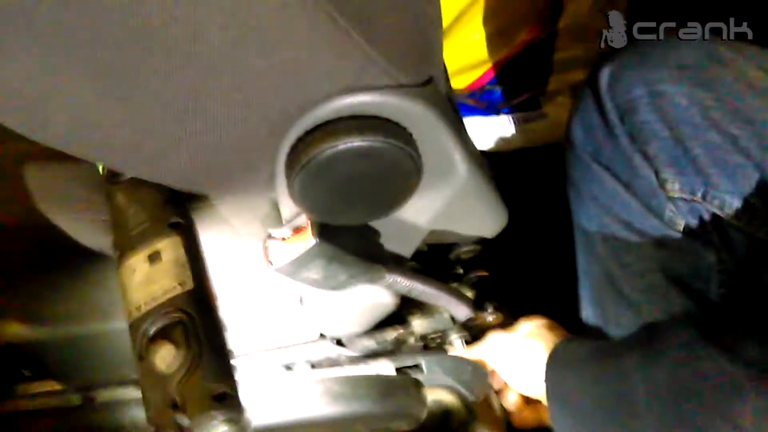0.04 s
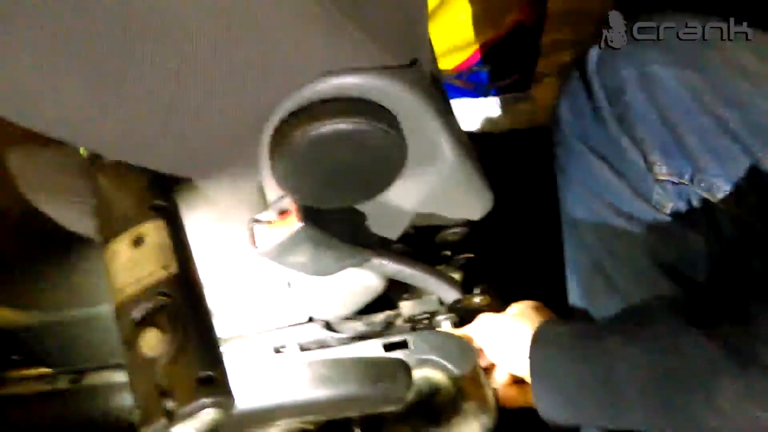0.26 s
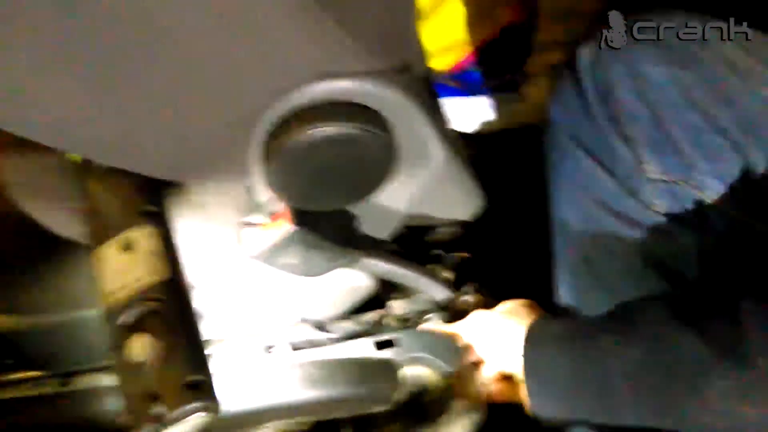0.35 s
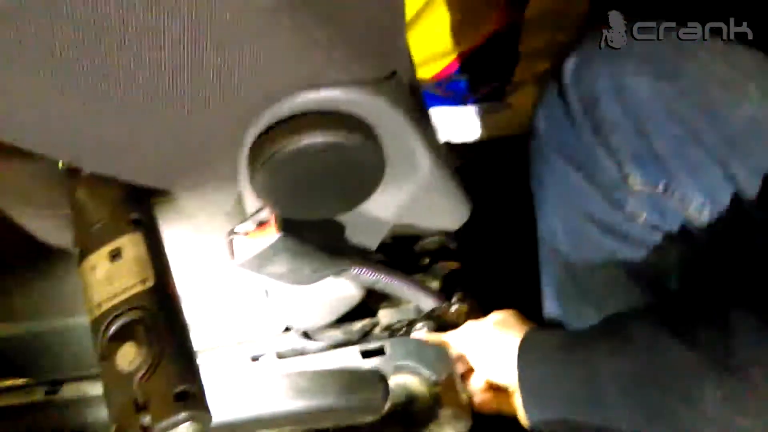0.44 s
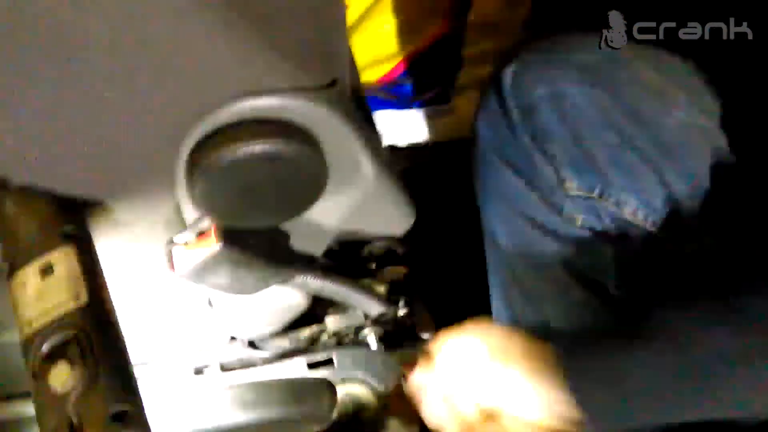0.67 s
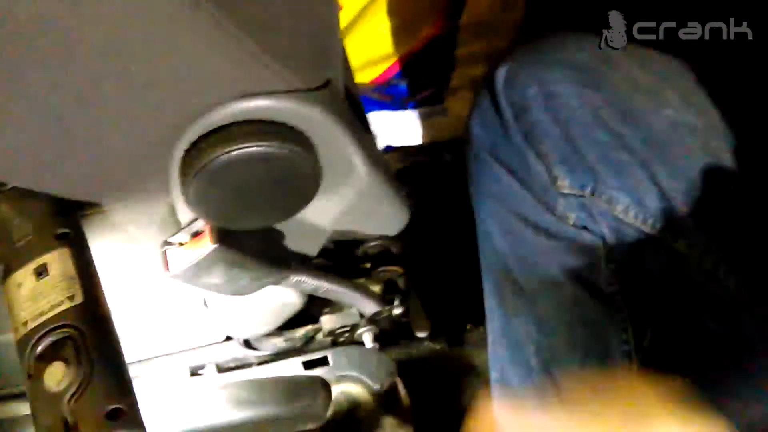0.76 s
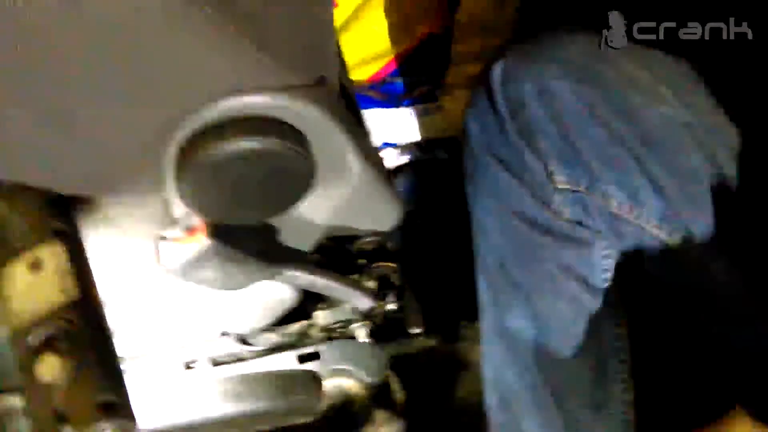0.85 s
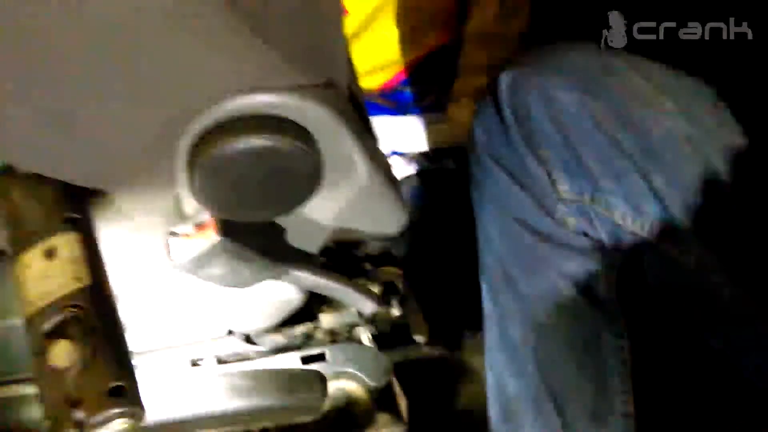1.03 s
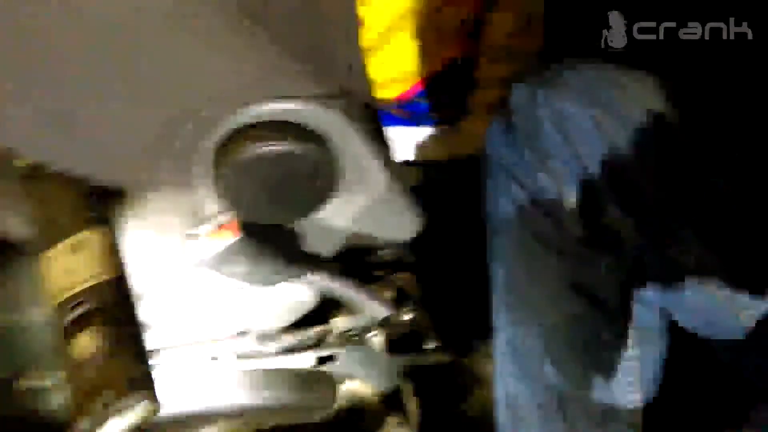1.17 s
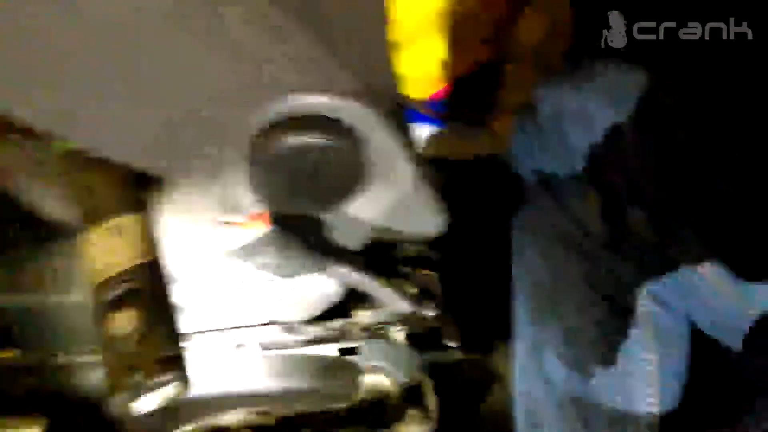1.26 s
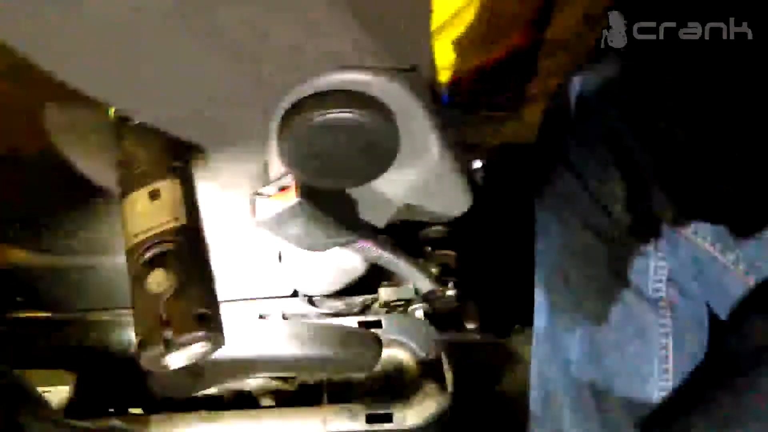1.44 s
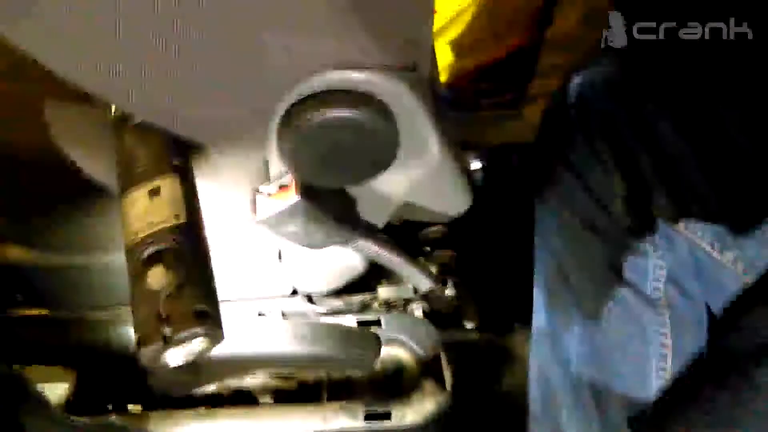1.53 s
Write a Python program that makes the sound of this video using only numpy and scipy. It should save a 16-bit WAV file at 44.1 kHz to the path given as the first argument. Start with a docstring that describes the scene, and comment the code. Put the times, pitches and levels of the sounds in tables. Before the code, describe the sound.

One sharp plastic and metal click with a dull thump, then a faint sleeve swish.

```python
"""A plastic part clacks and a metal catch snaps as a hand tool levers the part loose in a parked car.
Each impact excites damped normal modes and a burst of contact noise. The panel behind gives softly,
then thumps in its low modes; absorption in the padded cabin makes the reverberation brief.
Sliding friction makes the sleeve swish as the arm draws back. Light taps, a thin high whine,
a low rumble and a soft hiss lie around it."""
import sys
import numpy as np
from scipy import signal
from scipy.fft import rfft, irfft
from scipy.io import wavfile
from scipy.ndimage import uniform_filter1d

SR = 44100
rng = np.random.default_rng(int(sys.argv[2]) if len(sys.argv) > 2 else 0)


def log_audio(samples):
    """Write samples as a 16-bit WAV file to the path given in sys.argv[1]."""
    # one column per channel
    frames = np.atleast_2d(samples).T
    # limit to full scale, then quantise
    limited = np.clip(frames, -1, 1)
    pcm = np.round(limited * 32767).astype(np.int16)
    wavfile.write(sys.argv[1], SR, pcm)


N = 70560
RING_T = np.arange(SR // 2) / SR  # time since an impact, t/s
ONSET_S = 0.0005  # rise time constant of clacks and taps

# impacts on the plastic part: t/s, level/dB, treble gain/dB, mode frequency ratio
CLACKS = [(.2100, -20.5, -12, 0.904), (0.2144, -18, -20, 0.73), (.2226, -3, -10, 1.0),
          (.2246, -7, -4.5, 1.1), (.2265, -14, -17, 1.07)]
# modes of the plastic part: f/Hz, left level/dB, right level/dB, T60/s
PLASTIC_MODES = [(663, -29, -33, 0.023), (850, -39, -44, 0.013), (1150, -28, -23, 0.015),
                 (1518, -24, -10.5, 0.024), (1820, -46, -20, 0.031), (3140, -22, -21, 0.012),
                 (3480, -13.5, -14, 0.011), (5570, -19, -17, .012), (9530, -35, -19, 0.017),
                 (10700, -15, -39, 0.011)]
# its contact noise spectrum: f/Hz, left level/dB, right level/dB
CLACK_NOISE = [(202, 7.5, 15), (795, 8.5, 8.5), (1630, 5, 15.5), (3150, -17, 4), (4370, -7, 6.5),
               (7060, -2, 4.5), (9750, -3, 10), (13500, -9, -12), (16000, -16, -35)]


def clack(db, treble_db, pitch, treble_hz=4150):
    """Impact excitation: the plastic rings in heavily damped modes; gentle knocks are duller."""
    hit = modal_ring(PLASTIC_MODES, pitch) + amp(-15) * contact_noise(CLACK_NOISE, t60=0.026)
    hit *= 1 - np.exp(-RING_T / ONSET_S)
    dull = signal.sosfilt(signal.butter(2, treble_hz, fs=SR, output="sos"), hit)
    return amp(db) * (dull + amp(treble_db) * (hit - dull))


# impacts of the metal catch: t/s, level/dB
SNAPS = [(0.235, -9.5), (0.2401, 0), (.2409, -4), (0.2425, -9)]
# modes of the catch: f/Hz, left level/dB, right level/dB, T60/s
METAL_MODES = [(2150, -42, -26.5, 0.026), (2490, -42, -31.5, 0.026), (3250, -31, -27, .022),
               (5200, -48, -33, 0.015), (7270, -33, -18, 0.014), (7550, -29, -17, 0.018),
               (8230, -36, -26, 0.011), (10350, -33, -22.5, 0.017), (11850, -38, -28, 0.02),
               (13470, -22, -28, 0.0093)]
# its contact noise spectrum: f/Hz, left level/dB, right level/dB
SNAP_NOISE = [(300, -5, 7), (1610, -7, -2), (2400, -8, 6), (4160, -9, -7.5), (6540, -17, 2.5),
              (7820, 2, 11.5), (8800, -7, 2), (13900, -1, -6), (16000, -10, -8)]


def snap(db):
    """Free vibration: the metal catch springs against its stop and rings in high modes."""
    return amp(db) * (modal_ring(METAL_MODES) + amp(-20.5) * contact_noise(SNAP_NOISE, t60=0.02))


# pushes on the panel: t/s, level/dB, contact time/s
PUSHES = [(0.109, -19, 0.005), (.142, -9.5, 0.0069), (.2105, -8.5, 0.0016), (0.2172, -5, 0.0026),
          (0.2219, -10, 0.0011), (0.228, 1, 0.0018), (0.2515, 0, 0.00317), (.2765, -6.5, 0.0034),
          (.388, -10, 0.011), (.445, -10.5, 0.0083), (1.0232, -31, 0.00091), (1.18, -15, 0.009)]
# modes of the panel: f/Hz, level/dB, T60/s
PANEL_MODES = [(81.6, -33.5, 0.31), (107, -20.5, 0.075), (147, -23, 0.1), (189.4, -29, 0.167),
               (252.1, -20.5, 0.069), (304.4, -24.5, 0.085), (490, -19.5, 0.048), (670, -52, 0.06)]


def thump(db, contact_s):
    """Forced response: a half-sine force pulse is convolved with the panel's impulse response."""
    force = np.sin(np.pi * np.minimum(RING_T / contact_s, 1))
    response = sum(amp(level) * damped_mode(hz, t60) for hz, level, t60 in PANEL_MODES)
    radiation = signal.butter(2, 46, "high", fs=SR, output="sos")  # slow motion radiates little
    response = signal.sosfilt(radiation, response)
    return -amp(db) * signal.fftconvolve(response, force / force.sum())[:len(RING_T)]


# reverberation of the cabin: f/Hz, T60/s, level/dB
CABIN_DECAY = [(60, .45, -7), (170, .33, -8), (300, .3, -15), (490, .9, -10), (680, .11, -17),
               (2500, .09, -18), (8000, .06, -20), (16000, .055, -19)]


def cabin(sound):
    """Reverberation: padding absorbs the treble quickly, while the bass lingers."""
    hz, t, bands = signal.stft(rng.standard_normal((2, SR)), SR, nperseg=256)
    bands[1, :3] = bands[0, :3]  # the bass is alike on both sides
    t60 = read(CABIN_DECAY, hz)[:, None]
    equal_energy = np.sqrt(2 * np.log(1000) / (t60 * SR))
    bands *= amp(read(CABIN_DECAY, hz, column=2))[:, None] * decay(t60, t) * equal_energy
    response = signal.istft(bands, SR, nperseg=256)[1]
    return signal.fftconvolve(sound, response, axes=1)[:, :N]


# friction spectrum of the sleeve: f/Hz, left level/dB, right level/dB
SLEEVE_SPECTRUM = [(152, -20, -17), (370, -8.5, -8.5), (566, -1.5, 6), (856, -20, -9.5), (926, -4.5, 1),
                   (1380, -14, -6.5), (1737, -22, -4.5), (2300, -7, 2.5), (2900, -13, -4.5),
                   (4300, -22.5, -11.5), (5660, -20.5, -21), (8350, -18.5, -6.5), (11500, -16.5, -12.5),
                   (15500, -23, -24)]


def sleeve(peak_s=0.63, rise_s=0.12, fall_s=0.095):
    """Friction noise: the swish of sliding cloth grows in proportion to the arm's speed."""
    hz, t = np.fft.rfftfreq(N, 1 / SR), np.arange(N) / SR - peak_s
    shared, own = rfft(rng.standard_normal(N)), rfft(rng.standard_normal((2, N)))
    correlation = 1 / (1 + (hz / 2000) ** 2)
    spectrum = np.sqrt(correlation) * shared + np.sqrt(1 - correlation) * own
    swish = unit(irfft(spectrum * stereo_gains(SLEEVE_SPECTRUM, hz), N))
    speed = 1 / np.cosh(np.sqrt(2) * t / np.where(t < 0, rise_s, fall_s))
    return amp(-48) * speed * swish


# light taps among the parts: t/s, right level/dB, centre f/Hz, bandwidth/octaves, T60/s
TAPS = [(.0705, -36, 2500, .7, .025), (.0728, -33, 1400, .45, .028), (.0955, -32, 300, .35, .07),
        (.905, -50, 1000, 1.2, .025), (1.0232, -39, 800, 2.3, .02), (1.327, -52, 2000, .3, .025)]


def tap(db, hz, octaves, t60, left_db=-13):
    """Band-limited transient: a light touch on a small part gives a short rattle in one band."""
    edges = np.clip([hz / 2 ** (octaves / 2), hz * 2 ** (octaves / 2)], 20, SR / 2 - 1)
    bandpass = signal.butter(3, edges, "band", fs=SR, output="sos")
    rattle = signal.sosfilt(bandpass, rng.standard_normal(SR))[-len(RING_T):]
    envelope = decay(t60) * (1 - np.exp(-RING_T / ONSET_S))
    return amp([[db + left_db], [db]]) * unit(rattle) * envelope


# envelope of the whine: t/s, level/dB before the left and right gains
WHINE_ENVELOPE = [(.40, -93), (.42, -66), (.48, -73), (.525, -59.5), (.61, -71), (.68, -70), (.735, -58.5),
                  (.78, -70), (.87, -63.5), (.93, -75), (.975, -60.5), (1.01, -87), (1.2, -80),
                  (1.27, -101)]


def whine(centre_hz=7522, waver_hz=12.5, left_db=-12.5, right_db=5.5):
    """Frequency and amplitude modulation: a thin high tone wavers, pulses and fades."""
    hz = centre_hz + waver_hz * drift(N, size=700)
    tone = np.sqrt(2) * np.sin(2 * np.pi * np.cumsum(hz) / SR)
    db = np.interp(np.arange(N) / SR, *np.transpose(WHINE_ENVELOPE), left=-np.inf, right=-np.inf)
    return amp([[left_db], [right_db]]) * amp(db) * tone


# spectral density of the background: f/Hz, relative level/dB
FLOOR_SPECTRUM = [(12, -21), (25, -2.5), (60, 1), (100, -4), (190, -16), (290, -19), (360, -25.5),
                  (520, -25.5), (1250, -36), (2350, -31.5), (3900, -44.5), (6700, -44.5), (8700, -40),
                  (14700, -53), (16000, -56)]
# its balance: f/Hz, left level re right/dB
FLOOR_BALANCE = [(60, -0.5), (120, -0.5), (240, -0.5), (480, -2.0), (950, -4.5), (1890, -13.0),
                 (3770, -9.5), (7520, -9.5), (15000, -3.5)]
# likeness of its two sides: f/Hz, correlation coefficient
FLOOR_CORRELATION = [(60, 0.96), (150, 1), (380, 0.75), (950, 0.19), (2380, -0.26), (5980, 0.094),
                     (15000, -0.18)]


def background(swell_db=1.2, rumble_hz=216, flicker_db=1.5):
    """Partially coherent noise: an unevenly swelling rumble under a hiss stronger on the right."""
    hz, frames = np.fft.rfftfreq(1024, 1 / SR), N // 256 + 5
    a, b, c, d, flicker = rng.standard_normal((frames, len(hz), 5)).T
    shared, own = a + 1j * b, c + 1j * d
    correlation = np.clip(read(FLOOR_CORRELATION, hz), -1, 1)[:, None]
    left = amp(read(FLOOR_BALANCE, hz))[:, None]
    bands = np.array([left * shared, correlation * shared + np.sqrt(1 - correlation ** 2) * own])
    bands *= 2 / np.sqrt(1 + left ** 2 + 2 * correlation * left)  # the mean of both sides stays flat
    flicker = uniform_filter1d(flicker, size=10, axis=0)  # smooth over frequency
    flicker = unit(uniform_filter1d(flicker, size=14, axis=1))  # and over time
    swell = swell_db * drift(frames, size=12) / (1 + (hz[:, None] / rumble_hz) ** 2)
    bands *= amp(read(FLOOR_SPECTRUM, hz)[:, None] + flicker_db * flicker + swell)
    return amp(-47) * unit(signal.istft(bands, nperseg=1024, noverlap=768)[1][:, :N])


def modal_ring(modes, pitch=1, scatter=0.004):
    """Modal superposition: each blow gives every mode a slight detuning and a random sign per side."""
    sound = np.zeros((2, len(RING_T)))
    for hz, left_db, right_db, t60 in modes:
        polarity = np.sign(rng.standard_normal((2, 1)))
        detuning = 1 + scatter * rng.standard_normal()
        sound += polarity * amp([[left_db], [right_db]]) * damped_mode(hz * pitch * detuning, t60)
    return sound


def contact_noise(spectrum, t60):
    """Broadband transient: a contact gives a dying noise burst, partly shared by both sides."""
    n = len(RING_T)
    white = rng.standard_normal(n) + 0.5 * rng.standard_normal((2, n))
    gains = stereo_gains(spectrum, np.fft.rfftfreq(n, 1 / SR))
    return irfft(rfft(white) * gains, n) * decay(t60)


def damped_mode(hz, t60):
    """Impulse response of a damped harmonic oscillator."""
    return np.sin(2 * np.pi * hz * RING_T) * decay(t60)


def decay(t60, t=RING_T):
    """Exponential decay by 60 dB in t60 seconds."""
    return np.exp(-np.log(1000) * t / t60)


def drift(length, size):
    """Low-pass noise: a slow wander of rms 1, smoothed over size steps."""
    return unit(uniform_filter1d(uniform_filter1d(rng.standard_normal(length), size), size))


def stereo_gains(spectrum, hz):
    """Left and right magnitude responses from a table of levels."""
    return amp([read(spectrum, hz, column=1), read(spectrum, hz, column=2)])


def read(table, hz, column=1):
    """Interpolation of one column over log frequency."""
    rows = np.array(table, float)
    return np.interp(np.log(hz + 1), np.log(rows[:, 0] + 1), rows[:, column])


def amp(db):
    """Amplitude ratio of a level in decibels."""
    return 10 ** (np.asarray(db) / 20)


def unit(x):
    """Normalisation to rms 1."""
    return x / np.sqrt(np.mean(x ** 2) + 1e-20)


def scene():
    """Linear superposition: the impacts and their reverberation add to the swish, noise and whine."""
    hits = np.zeros((2, N))
    for source, events in ((clack, CLACKS), (snap, SNAPS), (thump, PUSHES), (tap, TAPS)):
        for start_s, *settings in events:
            span = hits[:, round(start_s * SR):][:, :len(RING_T)]
            span += source(*settings)[..., :span.shape[1]]
    return hits + cabin(hits) + sleeve() + background() + whine()


def record(dry):
    """Band limiting: a linear-phase low-pass filter cuts off at 16.2 kHz."""
    lowpass = signal.firwin(511, 16200, window=("kaiser", 9), fs=SR)
    return signal.oaconvolve(dry, lowpass[None], "same")


dry = scene()
out = record(dry)
log_audio(out)
```